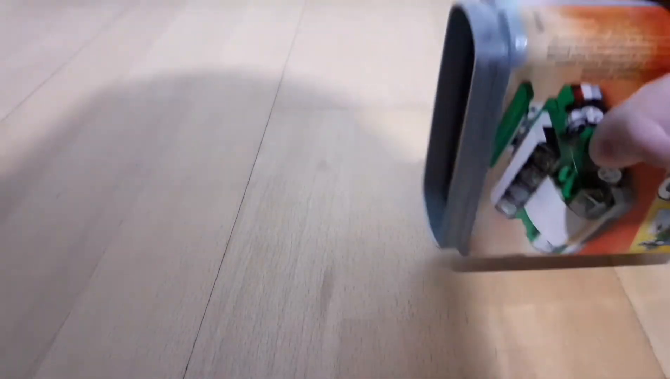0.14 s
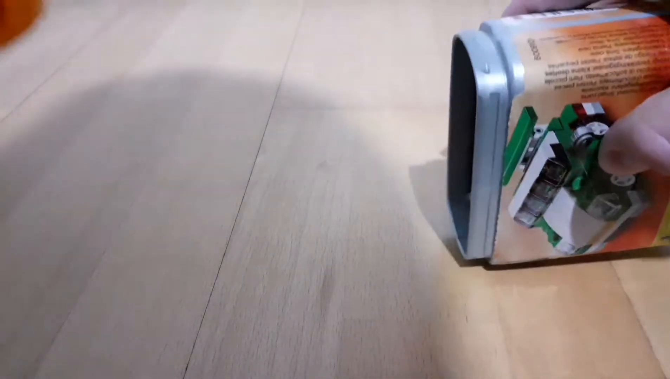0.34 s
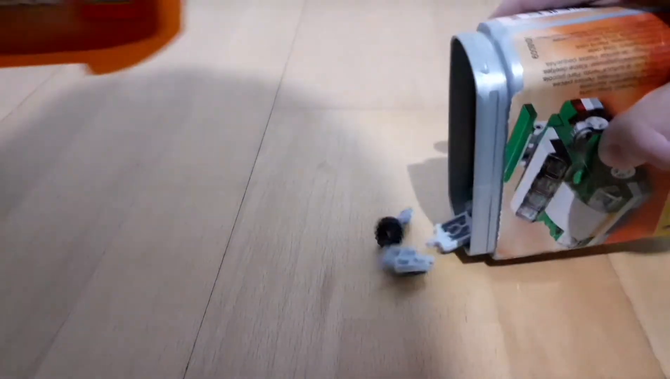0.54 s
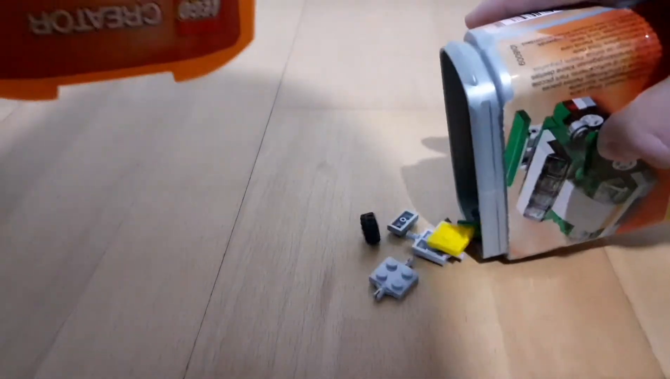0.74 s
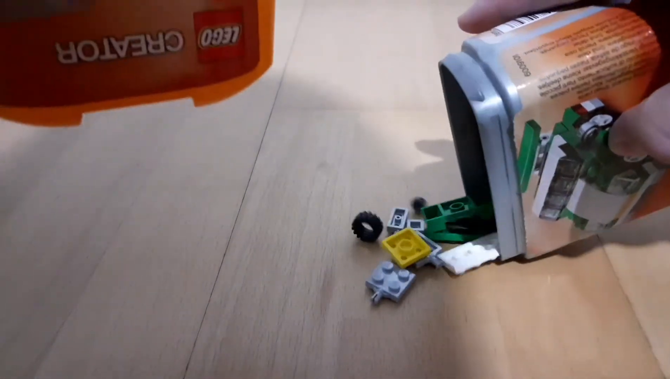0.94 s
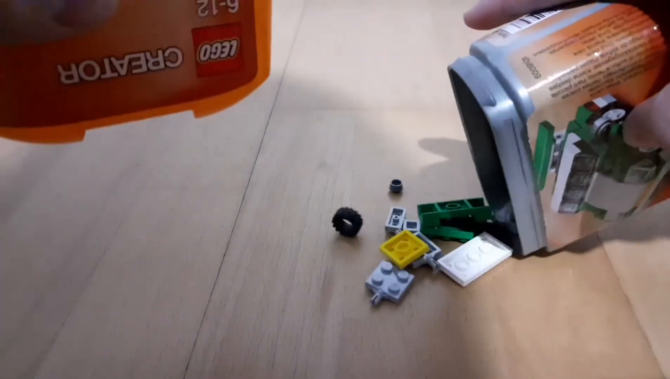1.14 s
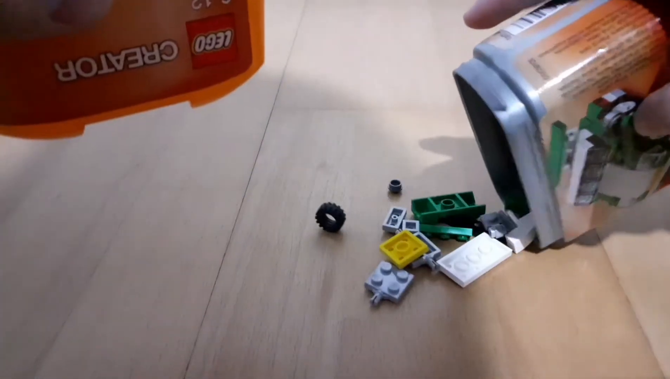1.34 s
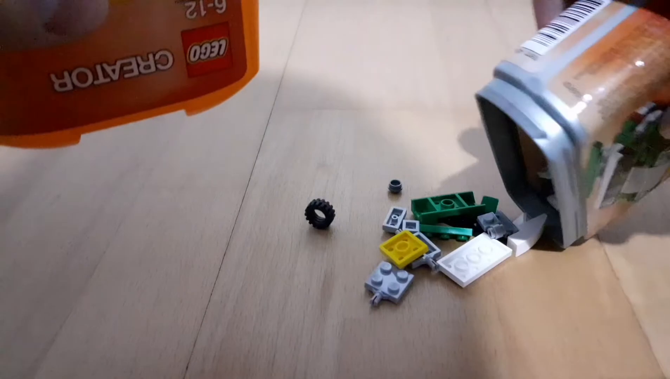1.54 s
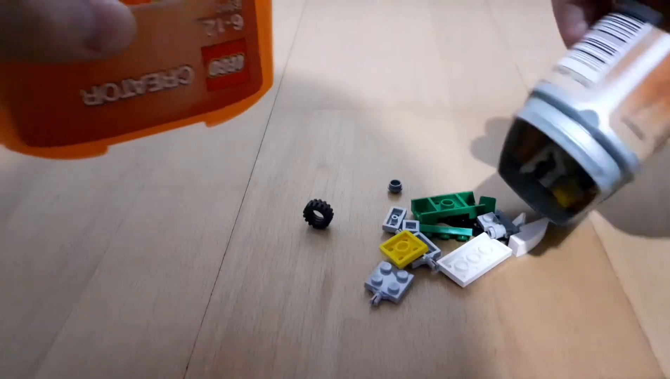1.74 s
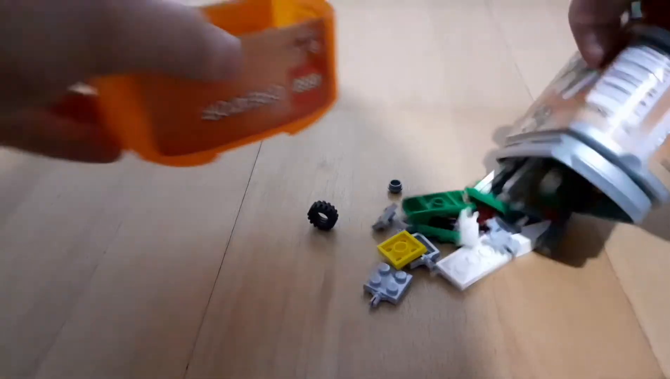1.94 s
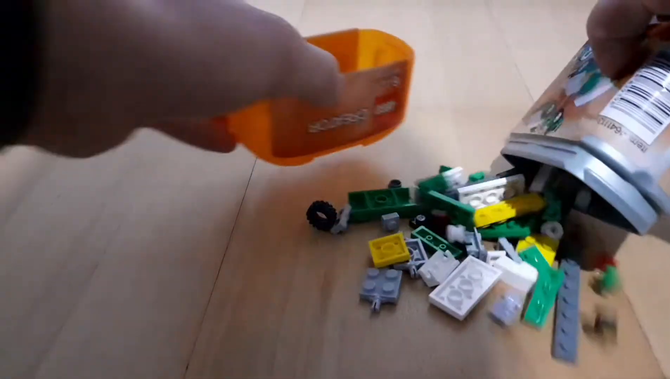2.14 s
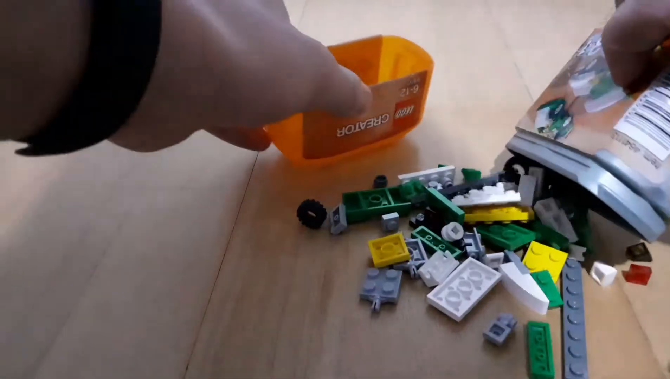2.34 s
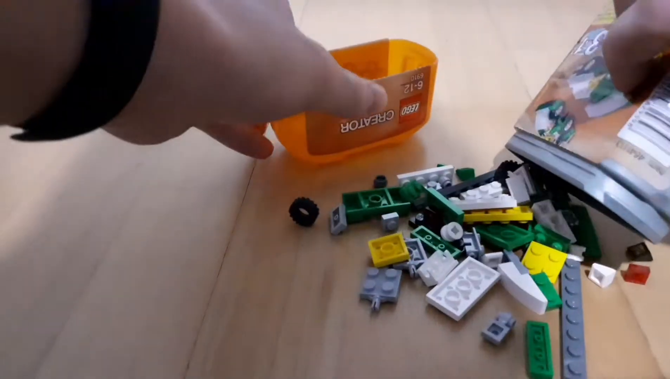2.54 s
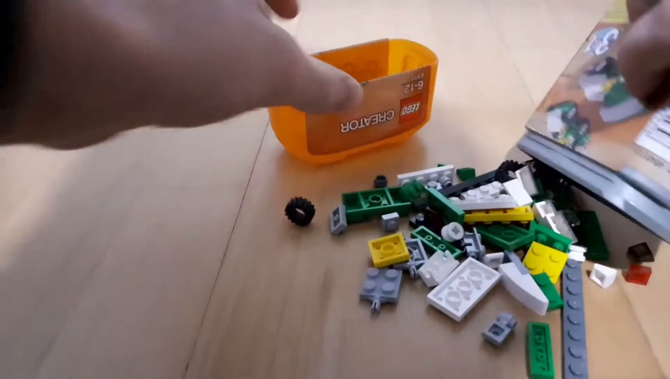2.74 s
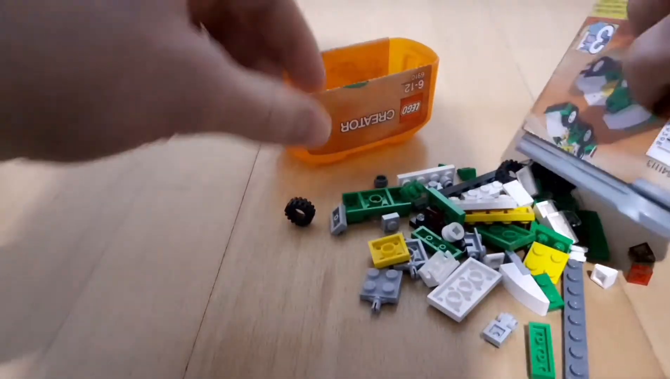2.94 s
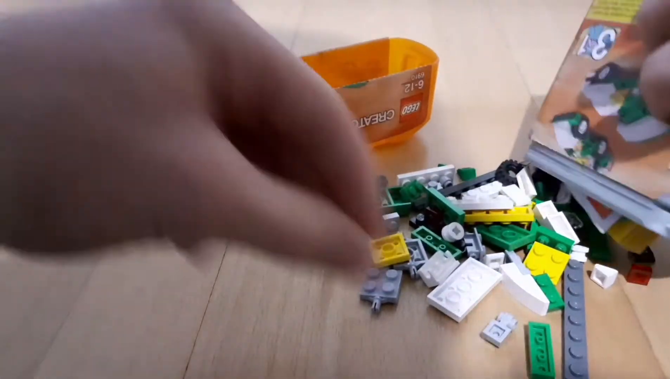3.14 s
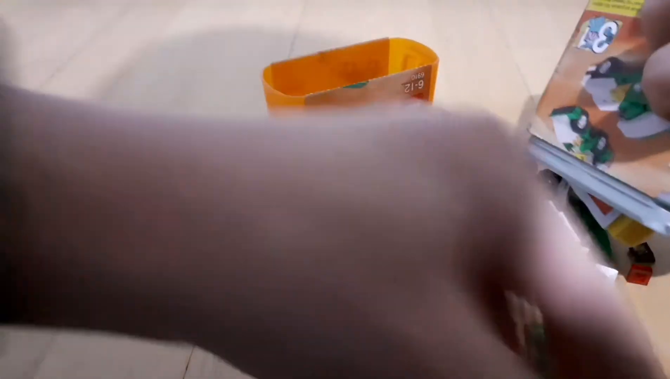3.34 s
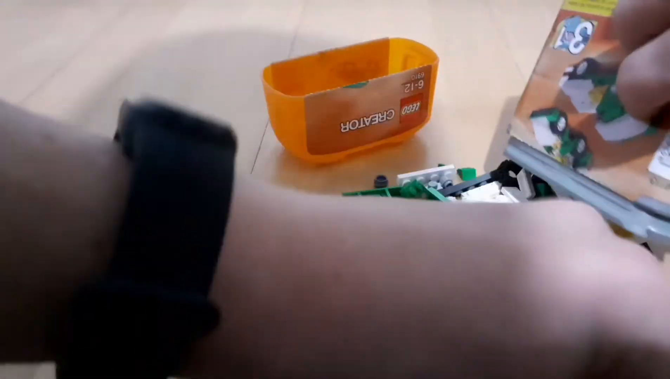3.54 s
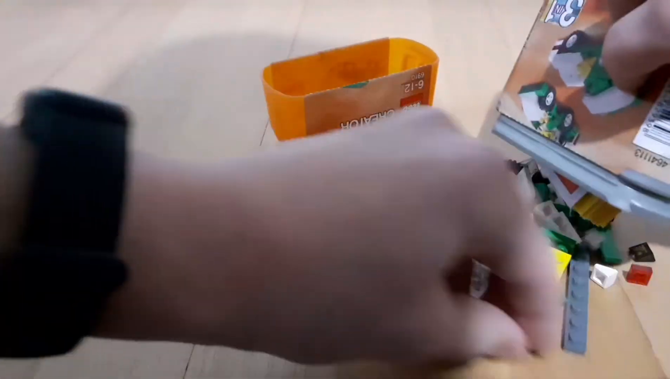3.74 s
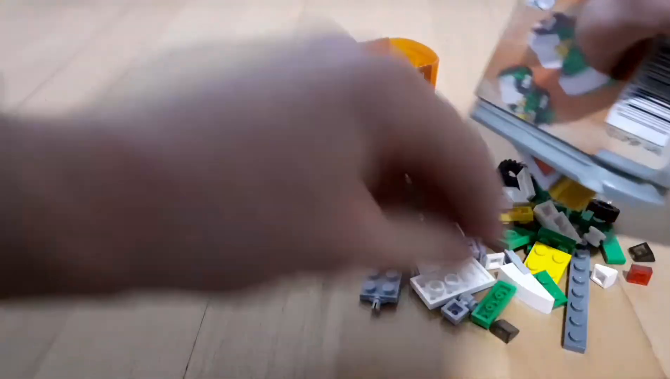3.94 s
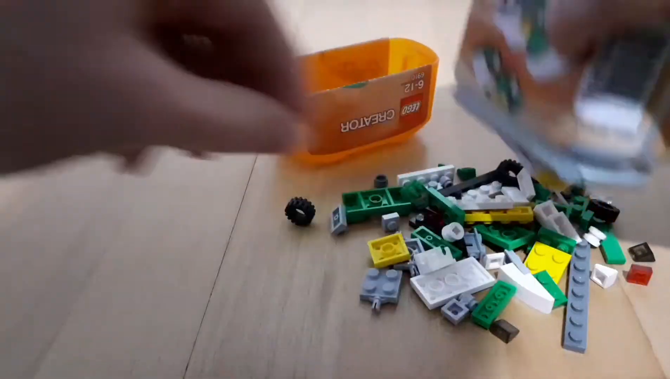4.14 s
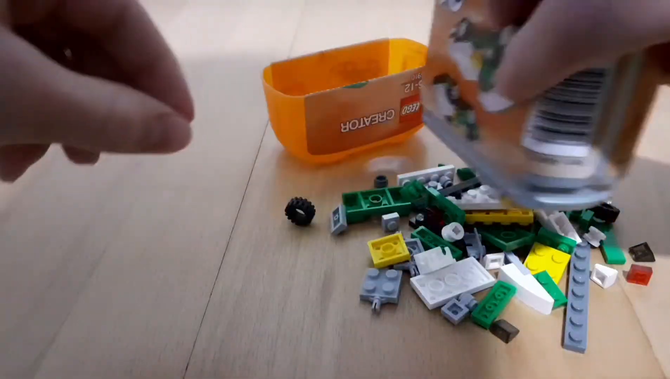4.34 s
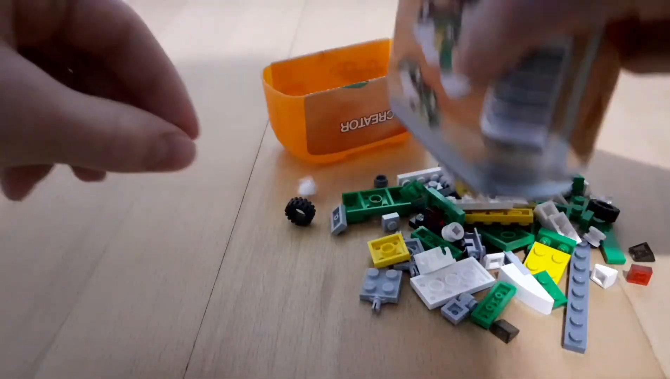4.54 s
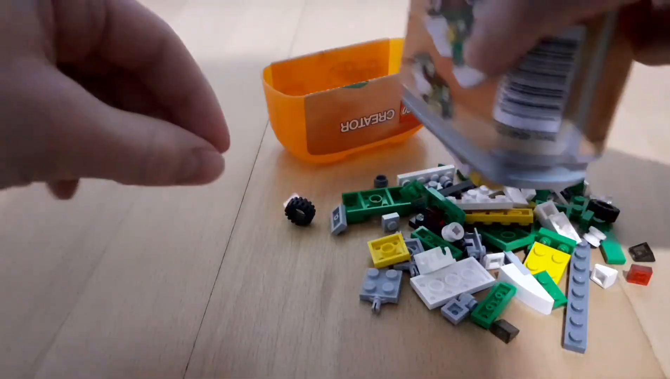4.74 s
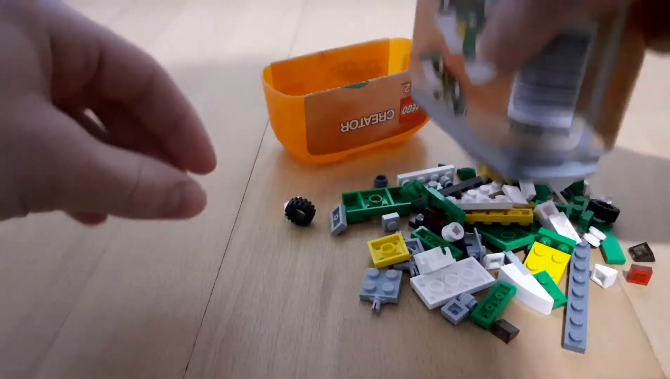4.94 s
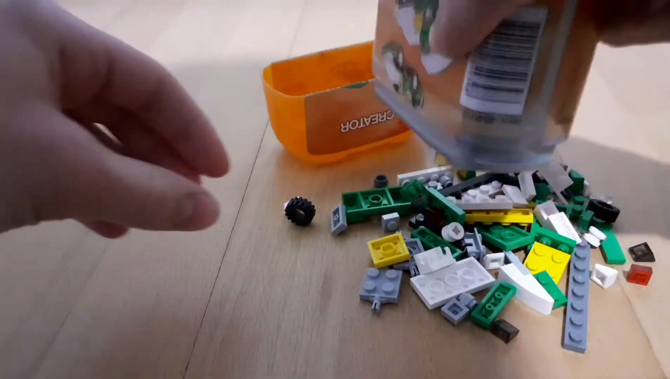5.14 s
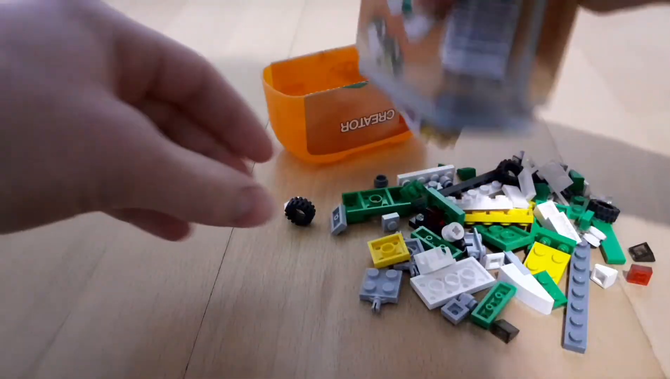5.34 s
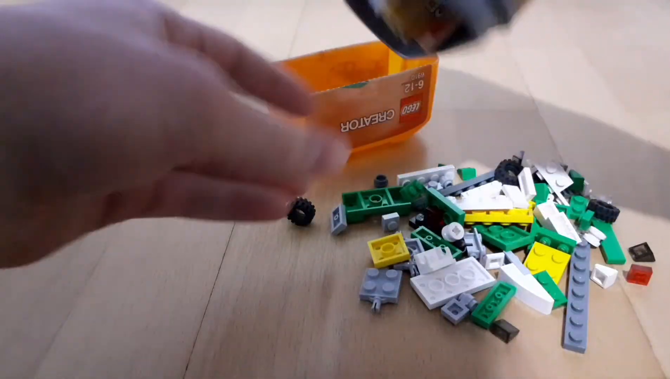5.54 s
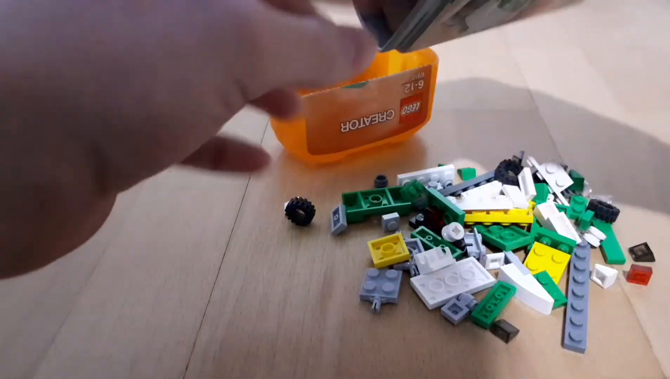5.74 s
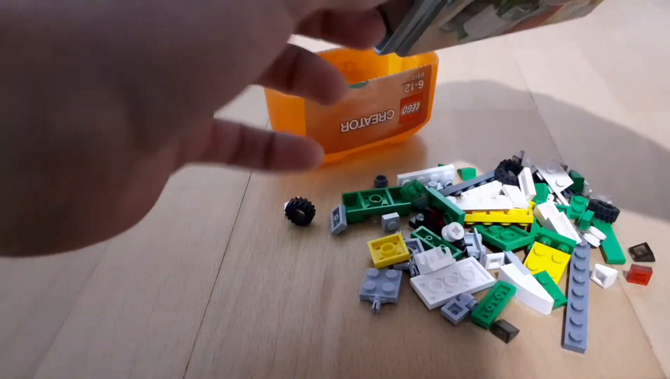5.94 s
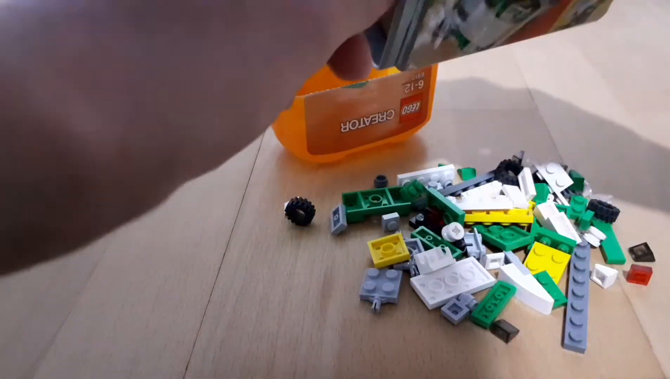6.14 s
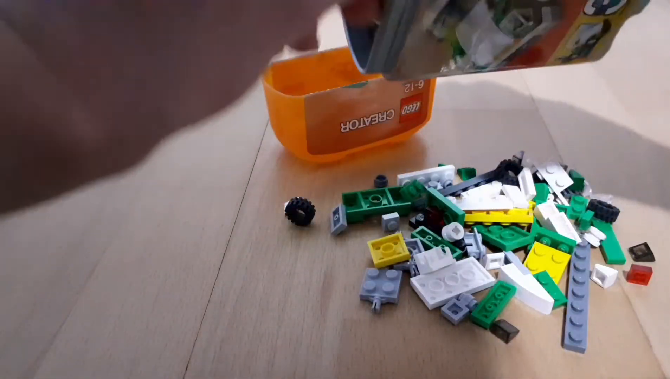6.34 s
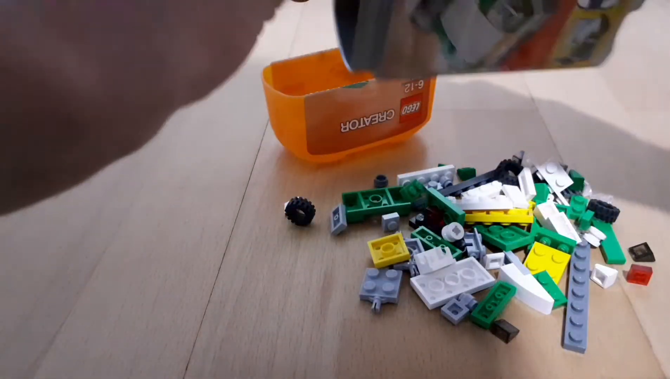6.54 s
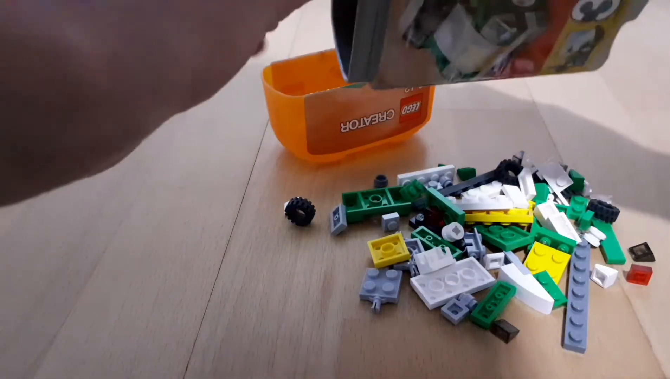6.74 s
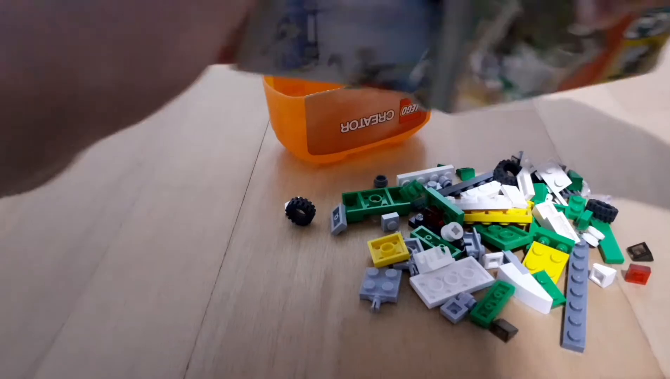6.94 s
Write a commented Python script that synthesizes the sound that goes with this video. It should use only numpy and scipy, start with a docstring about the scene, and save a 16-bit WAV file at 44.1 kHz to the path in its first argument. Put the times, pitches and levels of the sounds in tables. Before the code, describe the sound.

Hard plastic pieces pour from a hollow container onto floorboards with bright dense clatter, followed by sparse clicks, finger rubs and a few hollow knocks.

```python
"""Plastic toy bricks rattle in a hollow plastic tub, pour out onto a wooden floor and are stirred by hand.
Dense random contacts excite the damped modes of bricks, tub and boards; single clicks are bursts of banded noise.
Knocks ring the tub's walls, its air and the boards; fingers slipping on the wall are a dense shaped rub.
Soft low bumps and a steady hush lie beneath; a small room answers the contacts with a short noise tail.
Each contact reaches two ports at slightly different times."""
import sys
import numpy as np
from scipy import signal
from scipy.fft import rfft, irfft
from scipy.io import wavfile

SR = 44100
rng = np.random.default_rng(int(sys.argv[2]) if len(sys.argv) > 2 else 0)


def unload_wav(signal):
    """Save mono or channel-first audio to the path in sys.argv[1] as 16-bit WAV at rate SR, clipped to [-1, 1]."""
    wavfile.write(
        sys.argv[1],
        SR,
        np.round(np.clip(np.atleast_2d(signal).T, -1, 1) * 32767).astype(np.int16),
    )


N = 307818

# Motion of the bricks as their level. Each row: time in seconds, level in dB.
FIRST_TIP = [(0.0, -40), (0.141, -39), (0.19, -37), (0.323, -22), (0.374, -31.5), (0.445, -26),
             (0.576, -34), (0.618, -31), (0.919, -29.5), (1.022, -40), (1.12, -34), (1.335, -33),
             (1.503, -51), (1.624, -42), (1.719, -75)]
POUR = [(1.726, -44.5), (1.824, -29), (1.893, -37.5), (1.898, -25.5), (1.938, -23), (2.169, -26.5),
        (2.247, -32.5), (2.299, -28), (2.406, -33.5), (2.49, -44), (2.632, -38), (2.727, -57.5),
        (2.829, -70.5)]
STIR = [(2.842, -47), (2.919, -46.5), (2.953, -35.5), (3.051, -40.5), (3.118, -36), (3.374, -46),
        (3.5, -53), (3.679, -53)]
SWEEP = [(3.69, -37), (3.757, -35), (3.817, -40), (3.97, -81.5), (4.298, -71)]
SHAKE = [(4.309, -32.5), (4.416, -40.5), (4.566, -39), (4.693, -51), (4.76, -42.5), (4.865, -66.5),
         (4.945, -76)]
HANDLING = [(4.985, -64), (5.353, -54.5), (5.644, -66), (5.758, -50.5), (5.988, -79), (6.061, -48),
            (6.397, -52.5), (6.77, -60.5), (6.82, -39.5), (6.969, -44)]
# Balance of each gesture at middling motion. Each row: curve, tub above the bricks in dB, treble tilt in dB.
GESTURES = [(FIRST_TIP, -5, -1.5), (POUR, -6, 1), (STIR, -7.5, 0.26), (SWEEP, -10, 0.33), (SHAKE, -7, -0.3),
            (HANDLING, 0.42, -0.5)]
# Modes of the bricks. Each row: frequency in Hz, level in dB, t60 in seconds.
BRICK_MODES = [(1315, -4, 0.011), (1753, -6, 0.019), (2030, -1, 0.018), (2500, -1.5, 0.022),
               (2740, -4, 0.019), (3880, -6.5, 0.0025), (4560, 0.5, 0.0074), (5250, -4, 0.013),
               (5800, -8.5, 0.035), (5880, -6.5, 0.024), (6350, -9.5, 0.024), (7940, -1.5, 0.025),
               (8350, -3.5, 0.025), (9220, -17.5, 0.03), (10460, -8, 0.03), (10956, -4.5, 0.024),
               (12260, -2.5, 0.017), (14200, -7.5, 0.014)]
# Modes of the tub and its air column. Each row: frequency in Hz, level in dB, t60 in seconds (knocks shorten it).
TUB_MODES = [(413, -13.5, 0.11), (539, -5.5, 0.029), (611, -0.5, 0.039), (677, -6, 0.076),
             (729, -3.5, 0.067), (902, 0, 0.011), (1040, -14, 0.082), (1346, -0.5, 0.017),
             (1764, -9, 0.055)]
# Modes of the floor boards. Each row: frequency in Hz, level in dB, t60 in seconds (knocks lengthen it slightly).
BOARD_MODES = [(149, -20, 0.062), (190, -7, 0.12), (245.4, -2.5, 0.084), (325, -4.5, 0.031)]
# Stretches in which one piece is struck most and its mode is lifted (or, if negative, lowered).
# Each row: start in seconds, length in seconds, mode in Hz, lift in dB.
LEADERS = [(0.3, 0.29, 5750, 14), (0.6, 0.15, 5750, 15.5), (0.66, 0.16, 10700, 5), (0.95, 0.25, 8350, 6),
           (1.2, 0.25, 2740, 4.5), (1.93, 0.3, 5880, 9.5), (0.16, 0.5, 11040, 7), (0.73, 0.14, 11040, 14.5),
           (0.3, 0.062, 7840, 10), (2.2, 0.82, 7840, 2.5), (0.39, 0.87, 2740, 10), (1.9, 0.29, 11040, 5.5),
           (2.9, 0.9, 8350, 7.5), (2.94, 0.2, 1050, 9), (1.6, 0.6, 1050, 6), (2.2, 0.06, 6400, 13),
           (2.45, 0.8, 414, 7.5), (3.72, 0.24, 7840, 4.5), (6.1, 0.24, 533, -4), (4.31, 0.1, 14200, 16)]
# Knocks on the tub. Each row: time in seconds, level of the ringing air and drive of the walls in dB,
# pitch of the air inside in Hz, drive of the boards in dB, contact time in ms.
KNOCKS = [(0.041, -31, 790, -72, 0.32), (0.053, -21, 720, -66, 0.34), (0.159, -22.5, 670, -56, 0.39),
          (0.175, -21, 860, -60, 0.42), (0.19, -22, 735, -62, 0.36), (0.224, -16.5, 666, -62, 0.77),
          (0.251, -17.5, 730, -56, 0.7), (0.278, -16, 945, -51, 1), (0.289, -21, 706, -53, 0.94),
          (0.405, -11.5, 657, -36, 0.88), (0.515, -20.5, 663, -50, 0.48), (0.61, -10.5, 554, -29, 0.51),
          (0.909, -18, 530, -39, 0.9), (1.042, -22.5, 676, -60, 0.88), (1.227, -16.5, 657, -38, 0.78),
          (1.319, -30, 667, -67, 1), (1.525, -24, 610, -43, 0.81), (1.728, -9.5, 581, -35.5, 0.56),
          (1.921, -10, 598, -39.5, 0.79), (2.074, -10, 582, -38.5, 0.82), (2.29, -19.5, 540, -44.5, 0.36),
          (2.363, -24.5, 410, -52, 0.77), (2.487, -28.5, 460, -53, 0.45), (2.531, -24, 590, -44.5, 0.41),
          (2.643, -32, 637, -63, 0.91), (2.913, -13, 677, -46.5, 0.85), (2.943, -31, 670, -54, 0.96),
          (3.07, -26, 638, -64, 0.57), (3.284, -35, 680, -61, 0.56), (3.36, -30, 1067, -65, 0.7),
          (3.502, -36.5, 634, -69, 0.47), (3.517, -38, 407, -47.5, 0.52), (3.803, -30, 637, -54, 0.71),
          (4.075, -41.5, 672, -66, 0.67), (4.183, -39, 640, -68, 0.58), (4.307, -32, 570, -59, 0.36),
          (4.742, -36, 633, -79, 0.34), (4.976, -32, 674, -85, 0.78), (5.079, -37, 611, -70, 0.74),
          (5.178, -29, 697, -72, 0.6), (5.283, -29.5, 680, -64, 0.87), (5.447, -34, 626, -52.5, 0.44),
          (5.496, -32, 634, -60, 0.8), (5.504, -24, 723, -59, 0.76), (5.756, -25, 698, -67, 0.96),
          (5.763, -30, 656, -59, 0.78), (5.86, -49, 680, -71, 0.58), (6.006, -25, 670, -64, 0.95),
          (6.015, -29.5, 620, -47, 0.35), (6.041, -15, 686, -34.5, 0.17), (6.094, -26.5, 660, -50, 0.34),
          (6.191, -28, 702, -52, 0.4), (6.214, -27, 607, -56, 0.7), (6.364, -40, 600, -66, 0.7),
          (6.385, -44, 605, -70, 0.6), (6.533, -35, 660, -60.5, 0.5), (6.614, -25.5, 674, -57.5, 0.52),
          (6.624, -32, 686, -70, 0.76), (6.703, -37, 676, -64, 0.56), (6.785, -29.5, 650, -59, 0.93),
          (6.805, -29, 750, -56.5, 0.63), (6.816, -22, 630, -52, 1), (6.835, -9, 642, -43, 0.94),
          (6.919, -19, 548, -35.5, 0.91)]
# Single bricks clicking. Each row: time in seconds, peak level in dB, band centre in Hz,
# decay time in ms (held to 0.1-6 ms).
CLICKS = [(0.0728, -18.5, 1990, 1.1), (0.184, -24, 2500, 1.5), (0.2246, -20, 1760, 1),
          (0.255, -20, 2500, 1.5), (0.2989, -8.5, 9500, 4.8), (0.3768, -11, 10600, 2.2),
          (0.4074, -12.5, 3120, 1.7), (0.4376, -12.5, 3580, 4.9), (0.458, -20, 5930, 1.5),
          (0.5139, -17, 3500, 2.3), (0.549, -16, 5280, 0.5), (0.587, -26, 6000, 0.8),
          (0.603, -11, 4770, 5.2), (0.6307, -14, 7100, 1.2), (0.7064, -13, 4480, 1.1),
          (0.741, -23, 10900, 2.5), (0.755, -23, 11200, 3), (0.775, -6, 5880, 3), (0.809, -11, 11000, 1.7),
          (0.8406, -11.5, 8900, 2), (0.8652, -12.5, 4060, 3.2), (0.91, -11.5, 3880, 4),
          (0.983, -28, 8200, 1), (1.023, -19.5, 9290, 3.8), (1.0422, -14.5, 4490, 1.2),
          (1.053, -14.5, 7200, 2.8), (1.103, -23, 3330, 2.5), (1.1264, -13, 5320, 0.66),
          (1.1349, -12.5, 4400, 2.1), (1.163, -15, 3550, 4.3), (1.2514, -15.5, 7500, 3),
          (1.303, -17, 4380, 0.4), (1.322, -17.5, 3200, 2.9), (1.404, -14.5, 5100, 0.31),
          (1.424, -20.5, 4460, 0.44), (1.47, -19.5, 5600, 1.7), (1.524, -23.5, 5270, 0.41),
          (1.534, -21, 8780, 0.48), (1.5413, -21.5, 7100, 0.3), (1.561, -22, 7330, 0.46),
          (1.587, -28, 7000, 0.5), (1.6055, -14.5, 11600, 3.3), (1.631, -21, 3430, 0.32),
          (1.7272, -26, 1630, 2.2), (1.8282, -23, 6000, 2), (1.899, -15, 6590, 1.6), (1.905, -30, 7000, 1),
          (1.9183, -7.5, 8350, 6.5), (1.9522, -4, 6350, 2.4), (2.165, -12.5, 6420, 2.8),
          (2.2847, -11.5, 5480, 1.3), (2.2929, -17, 1290, 4.4), (2.322, -17, 8050, 0.85),
          (2.3548, -5, 4380, 0.6), (2.3827, -11, 7900, 0.39), (2.5092, -24, 6920, 2.7),
          (2.532, -18.5, 1740, 0.57), (2.5385, -22, 1580, 1.1), (2.5794, -18.5, 8250, 1.7),
          (2.605, -23, 8900, 0.5), (2.6146, -18, 5900, 1.1), (2.6603, -24, 5100, 1.1),
          (2.8422, -28.5, 4300, 0.94), (2.86, -25.5, 5560, 1.3), (2.9442, -19, 4300, 2.7),
          (3.07, -24, 1650, 3.4), (3.0874, -14.5, 7140, 1.1), (3.2322, -18.5, 4200, 1.4),
          (3.293, -21, 6700, 1.9), (3.362, -42, 1100, 6.8), (3.3854, -27, 5610, 0.95),
          (3.503, -38, 3620, 4.2), (3.6717, -32, 4020, 3), (3.6923, -13, 7100, 2.4),
          (3.6972, -16.5, 8480, 3), (3.8062, -23, 3290, 1), (3.8578, -29.5, 2920, 0.95),
          (4.3067, -4.5, 12100, 1.9), (4.4127, -7.5, 5100, 1), (4.445, -13.5, 6900, 3.5),
          (4.4584, -9.5, 5110, 0.73), (4.5056, -29, 4800, 0.51), (4.5134, -10.5, 5540, 0.55),
          (4.5483, -21.5, 3700, 2.7), (4.571, -21.5, 5360, 1.1), (4.588, -26, 6310, 0.7),
          (4.605, -19.5, 6000, 1.8), (4.6615, -22, 6600, 1.4), (4.7098, -23, 9220, 2.3),
          (4.722, -25.5, 7980, 0.55), (4.7553, -21, 6170, 1.1), (4.788, -35, 8000, 1),
          (4.805, -37, 9000, 1), (5.08, -41, 5030, 2), (5.443, -36, 3650, 3.6), (5.492, -29, 2290, 4.5),
          (5.5001, -16.5, 1970, 0.32), (5.656, -43, 8150, 2), (5.7653, -20.5, 2380, 2.4),
          (6.0048, -24.5, 2050, 0.7), (6.0165, -31, 1980, 1.8), (6.04, -17, 2630, 1.4),
          (6.094, -26.5, 2030, 1.5), (6.2701, -24, 5370, 1.8), (6.613, -33, 1510, 2.6),
          (6.849, -11, 5280, 0.87)]
# Soft low bumps. Each row: time in seconds, initial pitch in Hz, level in dB, length in seconds.
BUMPS = [(3, 69.8, -47.5, 0.13), (6.03, 80.5, -57, 0.049), (6.122, 130, -58, 0.027),
         (6.805, 69.5, -59.5, 0.045), (6.901, 101, -47.5, 0.061)]
# Fingers slipping on the tub wall. Each row: start in seconds, length in seconds, level in dB,
# share of the length spent rising, treble in dB.
SLIPS = [(4.076, 0.07, -54.5, 0.59, 5.5), (4.172, 0.042, -50.5, 0.95, 2), (4.921, 0.063, -37, 0.88, 3.5),
         (5.139, 0.068, -36, 0.24, 4.5), (5.318, 0.044, -33.5, 0.5, 5), (5.476, 0.04, -27, 0.73, -9),
         (5.749, 0.026, -31, 0.54, -29), (6.003, 0.025, -31, 0.25, -26.5), (6.175, 0.084, -34, 0.43, 0.5),
         (6.382, 0.043, -52.5, 0.53, 13), (6.805, 0.054, -32, 0.69, 7), (6.89, 0.051, -41, 0.74, 10)]
# Spectra of the bare contact, the rub and the hush. Each row: frequency in Hz, level in dB (floored at -50).
CRACK_SPECTRUM = [(530, -55), (900, -2), (2190, -4), (2600, -1), (4050, -0.5), (5890, 1), (9200, -3.5),
                  (10900, -3.5), (16000, -9)]
RUB_SPECTRUM = [(180, -40), (300, -39.5), (749, 0), (1150, -15), (1400, -11.5), (1700, -20), (2000, -6.5),
                (2500, -7), (4000, -16.5), (5300, -15.5), (7080, -14.5), (16000, -21)]
HUSH_SPECTRUM = [(15, -62), (25, -36.5), (97, -15.5), (161, -12), (335, -13), (489, -16), (962, -23),
                 (1070, -15.5), (1230, -14), (4370, -19), (5200, -25), (9500, -30), (16000, -25)]

CONTACTS_PER_S, TUB_CONTACTS_PER_S, BOARD_CONTACTS_PER_S = 2000, 750, 160
MIDDLING_DB = -38
TUB_FOLLOWS = 0.82   # share of the motion's swing in dB
TILT_PER_DB = 0.1448   # harder motion is brighter
TUB_REST_DB = -65.5   # the held tub murmurs
RING_FOLLOWS = 0.3   # exponent: gentle contacts ring the bricks less
TUB_LOW_HZ = 390   # the tub radiates little below this
TUB_SOFT_HZ, TUB_SHARPNESS = 930, 1.3   # corner and exponent: gentle contacts leave upper tub modes quiet
PIECE_DETUNE = 0.012   # alike pieces ring a little apart in pitch
AIR_T60_S, AIR_RISE_CONTACTS = 0.041, 3.3   # the air swells over a few contact times
WALL_DB, KNOCK_SPREAD_DB = -6, 3   # walls under the air; spread between modes
TWIN_RATIO, TWIN_DB = 1.2, -8.5   # a second air mode above the first
CLICK_OCTAVES, NARROW_BELOW_HZ = 1.59, 3800   # band width; low clicks are narrower in proportion
CLICK_RISE_SHARE, CLICK_RING_DB = 0.18, -17.5   # rise as a share of decay time; level of the brick mode
BUMP_PHASE_SAG_PER_S, BUMP_ROUGH = 0.74, 0.61   # falling pitch; weight of the lumpy noise
SLIP_DULLING_DB = 6.5   # the treble fades along a slip as the skin slows
ROOM_T60_S, WALL_CUT_HZ, ROOM_DB = 0.25, 8000, -7.5
HUSH_DB = -63.5
LEFT_DB, LEFT_TREBLE_DB = 0.98, 0.68   # raised at the left, lowered as much at the right
CUTOFF_HZ = 16000


def amp(db):
    """Logarithmic level: decibels become a linear gain."""
    return 10 ** (np.asarray(db) / 20)


def rms_one(x):
    """Power normalisation: scale to an rms of 1."""
    return x / np.sqrt(np.mean(x ** 2) + 1e-20)


def butter(x, order, hz, kind):
    """Maximally flat filtering: pass the low, high or band part."""
    return signal.sosfilt(signal.butter(order, hz, kind, fs=SR, output="sos"), x)


def treble(x, hz):
    """First-order high-pass: keep the part above a corner."""
    return butter(x, 1, hz, "high")


def colour(x, points):
    """Minimum-phase filtering: a causal response gives the spectrum, so that nothing sounds early."""
    hz, level_db = np.transpose(points)
    grid = np.maximum(np.fft.rfftfreq(4096, 1 / SR), 1)
    grid_db = np.interp(np.log(grid), np.log(hz), np.maximum(level_db, -50))
    cepstrum = irfft(np.log(amp(grid_db)))
    # fold the cepstrum onto positive times
    cepstrum[1:2048] *= 2
    cepstrum[2049:] = 0
    response = irfft(np.exp(rfft(cepstrum)))
    return signal.oaconvolve(x, response[None], axes=1)[:, :N]


def ring(impulses, hz, t60):
    """Damped resonator: a unit impulse sets a decaying sine ringing."""
    radius, angle = amp(-60 / (t60 * SR)), 2 * np.pi * hz / SR
    feedback = [1, -2 * radius * np.cos(angle), radius * radius]
    return signal.lfilter([0, np.sin(angle)], feedback, impulses + 1e-18)


def drift(rate):
    """Slow random variation: normal values, rate a second, joined by straight lines."""
    knots = rng.standard_normal(int(N / SR * rate) + 2)
    return np.interp(np.arange(N) / SR * rate, np.arange(len(knots)), knots)


def two_ports(at, sizes, lag, pan_db):
    """Interaural-style cues: each contact differs by some samples and decibels between the ports."""
    out = np.zeros((2, N))
    right_at = at + np.round(lag).astype(int)
    np.add.at(out[0], np.clip(at, 0, N - 1), sizes * amp(pan_db / 2))
    np.add.at(out[1], np.clip(right_at, 0, N - 1), sizes * amp(-pan_db / 2))
    return out


def contacts(per_s, spread_db, lag_spread):
    """Random point process: times, uneven sizes, lags in samples, pans in dB and a choice from 0 to 1."""
    draw = rng.random((6, N))
    at = np.flatnonzero(draw[0] < per_s / SR)
    sizes = amp(-spread_db * np.log(1 - 0.97 * draw[1, at])) * np.sign(draw[2, at] - 0.5)
    lag = lag_spread * (2 * draw[3, at] - 1)
    pan_db = 5.8 * (2 * draw[4, at] - 1)
    return at, sizes, lag, pan_db, draw[5, at]


def body(modes, turnover_db, at, sizes, lag, pan_db, choice):
    """Modal synthesis: each contact excites one mode, whose level and pitch shift as other pieces take over."""
    which, out = (choice * len(modes)).astype(int), 0
    mode_hz = np.array(modes)[:, 0]
    for k, (hz, db, t60) in enumerate(modes):
        mine = which == k
        times = at[mine]
        level_db = db + turnover_db * drift(9)[times]
        for start, length, lead_hz, lift_db in LEADERS:
            nearest = abs(np.log(lead_hz / mode_hz)).argmin()
            if nearest == k and abs(np.log(lead_hz / hz)) < 0.15:
                leading = (times > start * SR) * (times < (start + length) * SR)
                level_db = level_db + lift_db * leading
        upper = drift(14)[times] > 0
        for piece, shift in ((upper, 1 + PIECE_DETUNE), (~upper, 1 - PIECE_DETUNE)):
            struck = two_ports(times, piece * sizes[mine] * amp(level_db), lag[mine], pan_db[mine])
            out = out + ring(struck, shift * hz, t60)
    return out


def motion():
    """Common excitation: brick gain, tub gain and treble tilt all follow how hard the bricks move."""
    rows = [(s, db, tub_db, tilt_db) for curve, tub_db, tilt_db in GESTURES for s, db in curve]
    s, *columns = np.transpose(rows)
    t, s = np.arange(N) / SR, np.maximum.accumulate(s)
    brick_db, tub_db, tilt_db = [np.interp(t, s, column) for column in columns]
    swing_db = brick_db - MIDDLING_DB
    moving_tub = amp(MIDDLING_DB + tub_db + TUB_FOLLOWS * swing_db)
    tub_gain = np.hypot(moving_tub, amp(TUB_REST_DB))
    return amp(brick_db), tub_gain, tilt_db + TILT_PER_DB * swing_db


def hush():
    """Stationary noise: a faint steady hush, independent in each port."""
    return amp(HUSH_DB) * rms_one(colour(rng.standard_normal((2, N)), HUSH_SPECTRUM))


def rattle():
    """Dense impact excitation: clumped brick contacts crack and ring, while others ring the tub and boards."""
    brick_gain, tub_gain, tilt_db = motion()
    effort = np.minimum(brick_gain / amp(MIDDLING_DB), 1)
    clumps = amp(2 * drift(90))

    hits = contacts(CONTACTS_PER_S, spread_db=1.5, lag_spread=5.0)
    crack = rms_one(colour(two_ports(*hits[:4]), CRACK_SPECTRUM))
    ringing = rms_one(body(BRICK_MODES, 2.4, *hits))
    bricks = crack + amp(-2.5) * effort ** RING_FOLLOWS * ringing
    bright = treble(bricks, 4040)
    bricks = amp(-tilt_db) * (bricks - bright) + amp(tilt_db) * bright

    tub = body(TUB_MODES, 1.34, *contacts(TUB_CONTACTS_PER_S, spread_db=3.5, lag_spread=2.6))
    tub = butter(tub, 2, TUB_LOW_HZ, "high")
    soft = butter(tub, 4, TUB_SOFT_HZ, "low")
    tub = soft + (tub - soft) * effort ** TUB_SHARPNESS

    boards = body(BOARD_MODES, 2.1, *contacts(BOARD_CONTACTS_PER_S, spread_db=3.5, lag_spread=5.74))
    boards = amp(-30) * brick_gain * rms_one(boards)
    return clumps * brick_gain * bricks + tub_gain * rms_one(tub) + boards


def knocks():
    """Impulse response to a finite push: walls and boards ring; the mouth's hold sets the air's pitch."""
    walls, boards, air = np.zeros((len(TUB_MODES), N + SR)), np.zeros(N + SR), np.zeros(N + SR)
    t = np.arange(SR // 8) / SR
    for s, db, hz, boards_db, contact_ms in KNOCKS:
        contact_ms, at = max(contact_ms, 0.1), round(s * SR)
        push = np.hanning(contact_ms * SR // 1000 + 3)
        push = push / push.sum()
        uneven_db = rng.normal(0, KNOCK_SPREAD_DB, (len(TUB_MODES), 1))
        walls[:, at:at + len(push)] += amp(db + WALL_DB + uneven_db) * push
        boards[at:at + len(push)] += amp(boards_db + 6) * push
        swell = np.sin(np.pi / 2 * np.minimum(1000 * t / (AIR_RISE_CONTACTS * contact_ms), 1))
        tone = np.sin(2 * np.pi * hz * t) + amp(TWIN_DB) * np.sin(2 * np.pi * hz * t * TWIN_RATIO)
        air[at:at + len(t)] += amp(db - 60 * t / AIR_T60_S) * swell * tone
    hollow = air[:N]
    for k, (hz, db, t60) in enumerate(TUB_MODES):
        hollow = hollow + (-1) ** k * amp(db) * ring(walls[k, :N], hz, 0.58 * t60)   # alternate signs
    hollow = butter(hollow, 2, TUB_LOW_HZ, "high")
    thud = sum(amp(db) * ring(boards[:N], hz, 1.02 * t60) for hz, db, t60 in BOARD_MODES)
    return hollow + thud * amp([[1.5], [-1.5]])


def clicks():
    """Transient noise burst: a gritty crack decays in the band that the two touching bricks sound in."""
    out, t = np.zeros((2, N + 2048)), np.arange(1024) / SR
    for s, db, hz, decay_ms in CLICKS:
        common, side = rng.standard_normal((2, len(t)))
        lag, pan_db = rng.integers(-4, 5), rng.normal(0.66, 1.25)
        rise = 1 - np.exp(-1000 * t / np.clip(CLICK_RISE_SHARE * decay_ms, 0.03, 3))
        fall = np.exp(-1000 * t / np.clip(decay_ms, 0.1, 6))
        crack = (common + 0.28 * side * [[1], [-1]]) * rise * fall
        octaves = CLICK_OCTAVES * min(hz / NARROW_BELOW_HZ, 1)
        edges = np.clip(hz * 2 ** (octaves * np.array([-0.5, 0.5])), 300, 19000)
        crack = butter(crack, 1 + (hz < NARROW_BELOW_HZ), edges, "band")
        peak = abs(crack.mean(axis=0)).max()
        click = amp(db) * crack / peak * amp([[pan_db], [-pan_db]])
        at = round(s * SR)
        out[0, at:][:len(t)] += click[0]
        out[1, max(at + lag, 0):][:len(t)] += click[1]
    return out[:, :N]


def click_rings():
    """Selective resonance: after each click the brick mode nearest to its band rings on."""
    s, db, hz, _ = np.transpose(CLICKS)
    nearest = abs(np.log(hz[:, None] / np.array(BRICK_MODES)[:, 0])).argmin(axis=1)
    places = 2 * rng.random((len(s), 2)) - 1
    out = 0
    for k, (mode_hz, _, t60) in enumerate(BRICK_MODES):
        mine = nearest == k
        at = (s[mine] * SR).astype(int)
        struck = two_ports(at, amp(db[mine] + CLICK_RING_DB), 4 * places[mine, 0], 3 * places[mine, 1])
        out = out + ring(struck, mode_hz, t60)
    return out


def bumps():
    """Low-frequency pulses: sinking cycles under a smooth swell, over a lumpy rumble that follows the motion."""
    t, out = np.arange(N) / SR, np.zeros((2, N))
    lumps = rms_one(butter(rng.standard_normal((2, N)), 2, [50, 130], "band"))
    for s, hz, db, length in BUMPS:
        sag = 1 - BUMP_PHASE_SAG_PER_S * np.clip(t - s, 0, length)
        cycles = np.sin(2 * np.pi * hz * (t - s) * sag)
        swell = np.sin(np.pi * np.clip((t - s) / length, 0, 1)) ** 2
        out += amp(db) * swell * (cycles + BUMP_ROUGH * lumps)
    rumble = amp(-54) * motion()[0] ** 0.66 * lumps
    return (out + rumble) * amp([[3.5], [-3.5]])   # stronger at the left


def slips():
    """Stick-slip friction: skin stutters over the wall as very dense small contacts that rise and fall."""
    t, low, high = np.arange(N) / SR, np.zeros(N), np.zeros(N)
    for s, length, db, rise, treble_db in SLIPS:
        top = s + np.clip(rise, 0.05, 0.95) * length
        stroke = amp(db) * np.interp(t, [s, top, s + length], [0, 1, 0]) ** 0.9
        dulling_db = SLIP_DULLING_DB * (np.clip((t - s) / length, 0, 1) - 0.5)
        low = low + stroke
        high = high + amp(treble_db - dulling_db) * stroke
    touches = contacts(3200, spread_db=1.3, lag_spread=3.4)
    rub = rms_one(colour(two_ports(*touches[:4]), RUB_SPECTRUM))
    bright = treble(rub, 2500)
    return low * (rub - bright) + high * bright


def room(x):
    """Diffuse reverberation: a tail of decaying noise, own in each channel, duller as it dies."""
    t = np.arange(SR // 2) / SR
    noise = rng.standard_normal((2, len(t)))
    dull = butter(noise, 1, WALL_CUT_HZ, "low")
    tail = dull + (noise - dull) * np.exp(-t / 0.022)
    tail = tail * amp(-60 * t / ROOM_T60_S) * (1 - np.exp(-t / 0.00019))
    tail = treble(tail, 500)
    return signal.oaconvolve(x, tail / np.sqrt(np.sum(tail ** 2) / 2), axes=1)[:, :N]


def scene():
    """Linear superposition: all sources, the room and the hush add; the left port faces the bricks."""
    near = rattle() + knocks() + clicks() + click_rings() + slips()
    near = butter(near, 3, 140, "high")   # the near sources carry little below 140 Hz
    out = near + amp(ROOM_DB) * room(near) + bumps() + hush()
    out = out + treble(out, 6300) * (amp([[LEFT_TREBLE_DB], [-LEFT_TREBLE_DB]]) - 1)
    return out * amp([[LEFT_DB], [-LEFT_DB]])


def record(dry):
    """Saturation and band limiting: the highest peaks are rounded, then the top is cut."""
    cut = signal.ellip(10, 0.5, 80, CUTOFF_HZ, fs=SR, output="sos")
    return signal.sosfilt(cut, 0.9 * np.tanh(dry / 0.9))


dry = scene()
out = record(dry)
unload_wav(out)
```